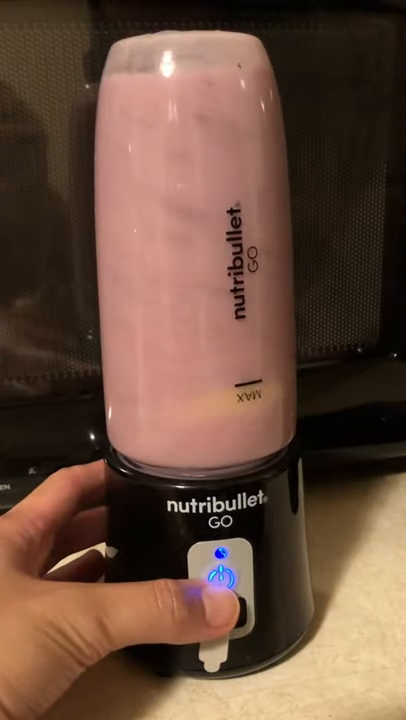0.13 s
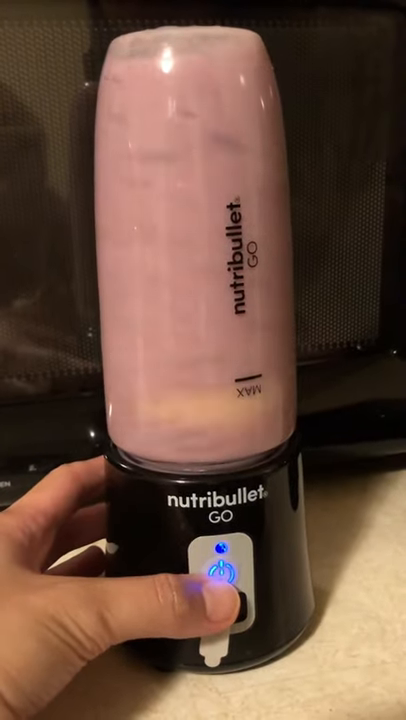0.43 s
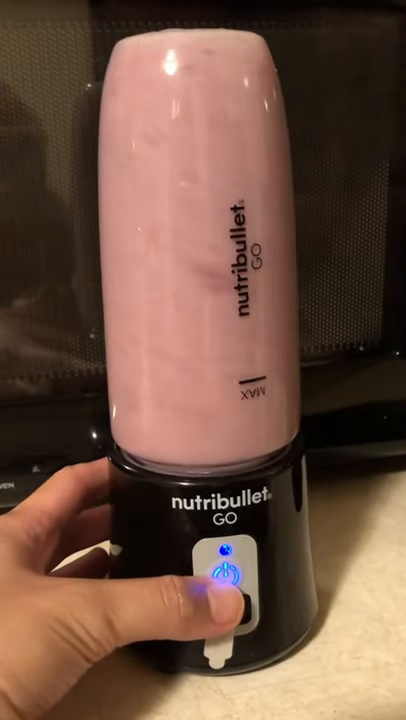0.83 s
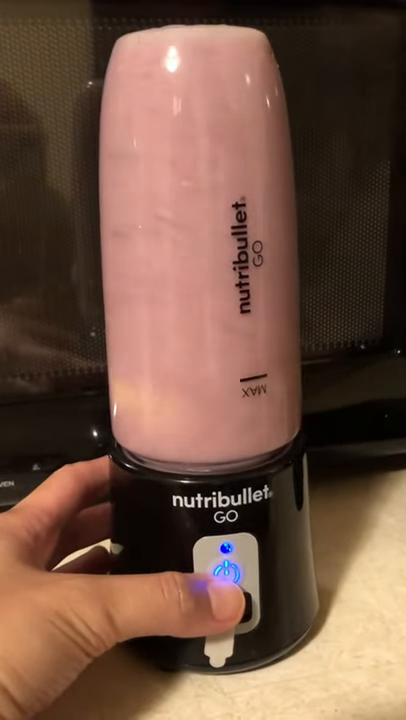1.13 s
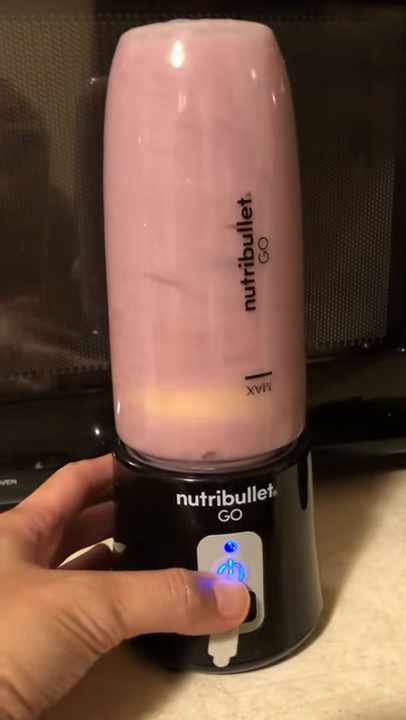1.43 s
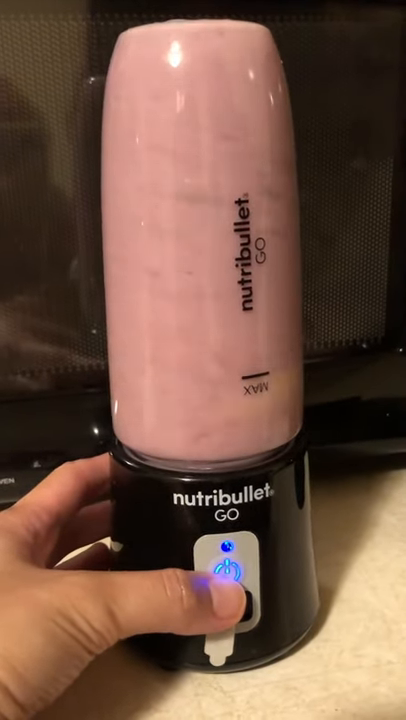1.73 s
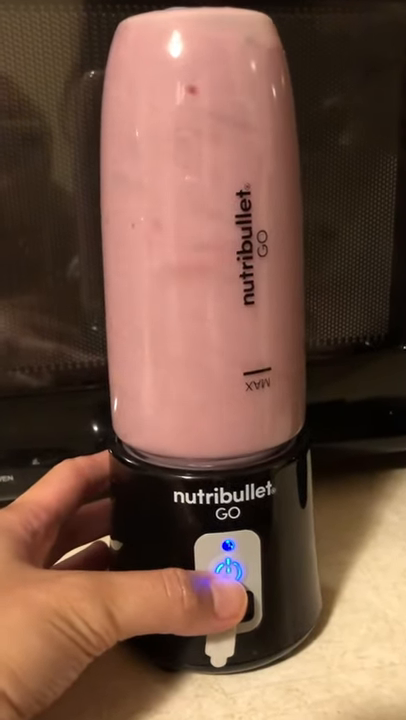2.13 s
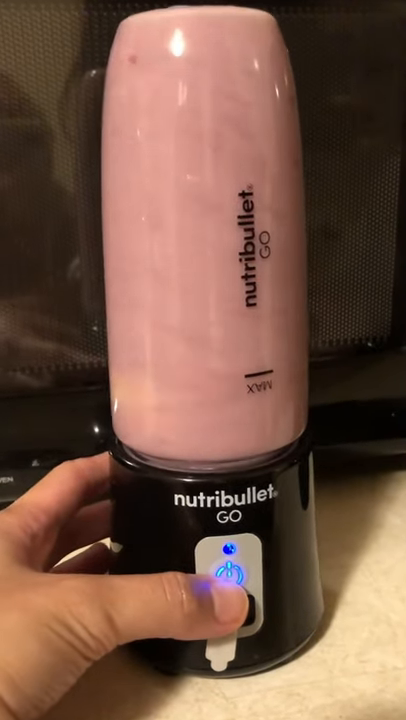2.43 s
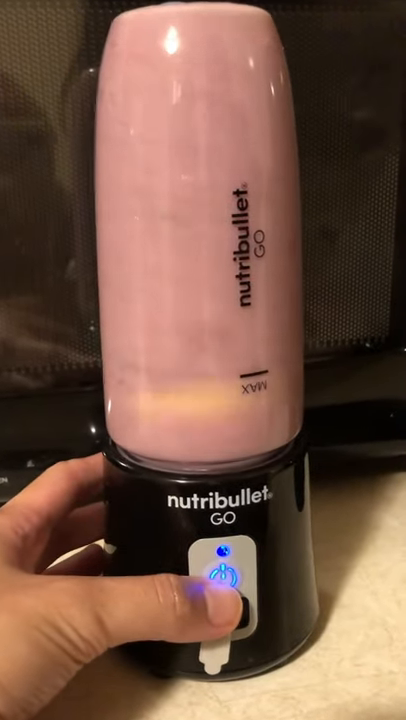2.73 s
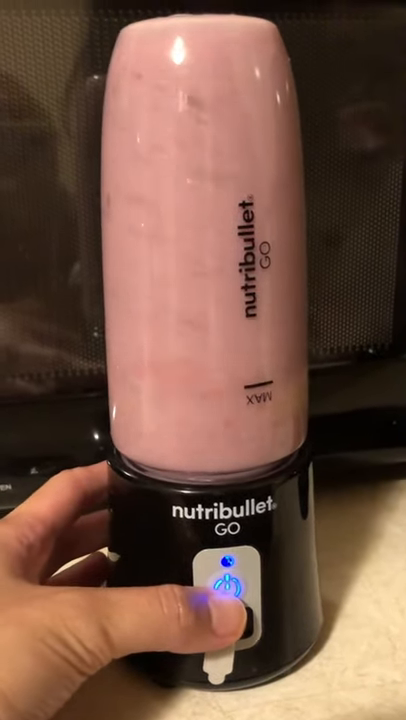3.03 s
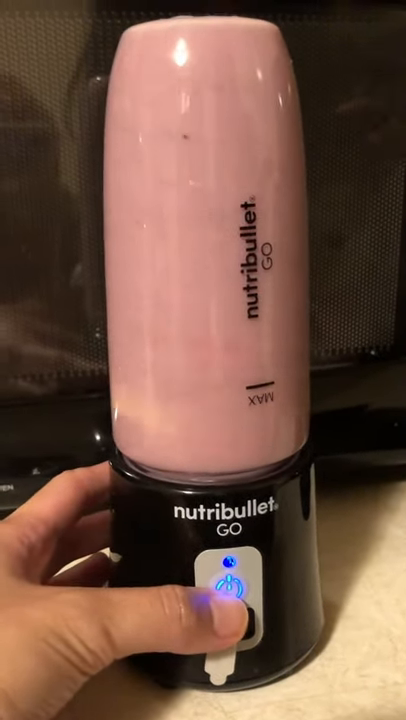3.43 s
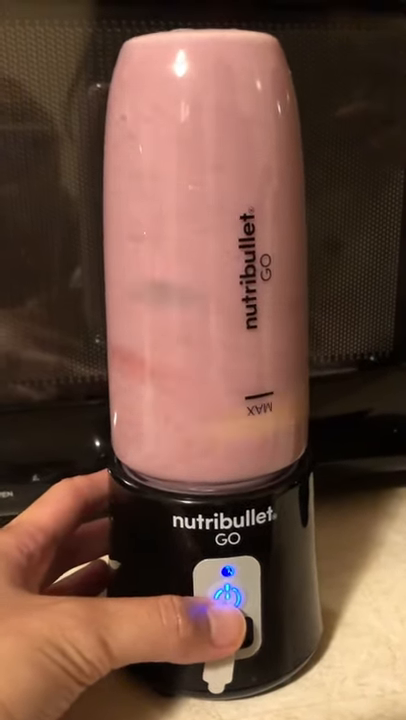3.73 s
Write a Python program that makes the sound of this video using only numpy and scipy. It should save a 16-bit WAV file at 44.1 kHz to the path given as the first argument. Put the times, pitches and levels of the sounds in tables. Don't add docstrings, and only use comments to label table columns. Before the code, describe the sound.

A small blender whirs and churns thick liquid steadily, with rough gurgling flutter and knocks.

```python
import sys
import numpy as np
from scipy import signal
from scipy.fft import rfft, irfft
from scipy.io import wavfile
from scipy.ndimage import uniform_filter1d, map_coordinates

SR = 44100
rng = np.random.default_rng(int(sys.argv[2]) if len(sys.argv) > 2 else 0)


def gain_from_decibels(decibels):
    exponent = np.asarray(decibels, float) / 20
    return 10 ** exponent


def log_audio(samples):
    frames = np.atleast_2d(samples).T
    limited = np.clip(frames, -1, 1)
    pcm = np.round(limited * 32767).astype(np.int16)
    wavfile.write(sys.argv[1], SR, pcm)


N = 171549
TIME = np.arange(N) / SR
SHAFT_HZ = 230.7


def unit(x):
    return x / np.sqrt(np.mean(x ** 2) + 1e-20)


def wobble(rate):
    knots = rng.standard_normal(int(N * rate / SR) + 4)
    return map_coordinates(knots, [np.arange(N) * rate / SR])


def ringing(modes, steep=1.307):
    f = np.fft.rfftfreq(16384, 1 / SR)
    power = 1e-14
    for hz, width, db in modes:
        detune = (f * f - hz * hz) / (f + 1) / width
        power = power + gain_from_decibels(db) ** 2 / (1 + detune ** 2) ** steep
    cepstrum = irfft(np.log(power) / 2)
    cepstrum[1:8192] *= 2
    cepstrum[8193:] = 0
    response = irfft(np.exp(rfft(cepstrum)))[:8192]
    return response / np.linalg.norm(response)


def through(x, response):
    return signal.fftconvolve(x, response)[:N]


def patchy(depth_db):
    grid = signal.stft(rng.standard_normal(N), nperseg=512)[2]
    field = uniform_filter1d(rng.standard_normal(grid.shape), size=6, axis=0)
    field = uniform_filter1d(field, size=8, axis=1)
    return unit(signal.istft(grid * gain_from_decibels(depth_db * unit(field)), nperseg=512)[1][:N])


# time in seconds, level in dB.
PULP_LOAD = [
    (0.0, -20),
    (0.16, -19.5),
    (0.43, -20.5),
    (1.66, -20),
    (1.71, -21),
    (2.46, -20.5),
    (2.96, -20.5),
    (3.7, -20),
    (3.89, -22.5),
]


def pulp_load():
    s, db = np.transpose(PULP_LOAD)
    surges_db = 0.23 * wobble(9.68) + 0.6 * wobble(34.39) + 0.83 * wobble(120)
    return gain_from_decibels(np.interp(TIME, s, db) + surges_db)


def bits():
    bits_per_s, tail_db = 1500, 2
    chance, side, force = rng.random((3, N))
    hits = (chance < bits_per_s / SR) * np.sign(side - .5)
    return unit(hits * gain_from_decibels(-tail_db * np.log(force + 1e-4)))


def sweeps():
    jitter, scatter_db, swell_db = .11, 3.4, 1.6
    turns = np.cumsum(SHAFT_HZ * (.97 + .03 * wobble(12))) / SR
    at = np.flatnonzero(np.diff(np.floor(turns)))
    late, size = rng.standard_normal((2, N))[:, at]
    at = at + (jitter * late * SR / SHAFT_HZ).astype(int)
    pushes = np.zeros(N)
    pushes[np.clip(at, 0, N - 1)] = gain_from_decibels(scatter_db * np.minimum(size, 2))
    return unit(pushes * gain_from_decibels(swell_db * wobble(30.12)))


# frequency in Hz, width in Hz, level in dB.
CUP_MODES = [(508, 170, -22), (655.3, 60, -12.5), (854, 41, -9.5), (1073, 102, 2), (1224, 137, -5.5),
             (1404, 82, -11.5), (1608, 156, -14), (1933, 204, -12.5), (2607, 360, -21), (2692, 320, -20),
             (3080, 213, -19), (3432, 320, -14), (3700, 230, -26.5), (4010, 480, -23)]


def cup_wall():
    return ringing(CUP_MODES)


def swirl(calm, swell, rattle):
    bits_db, splash_db = -7, -10
    rub = patchy(-(-1.1)) + gain_from_decibels(bits_db) * bits()
    splash = gain_from_decibels(splash_db) * swell * rng.standard_normal(N)
    return calm * rattle ** .3 * rub * gain_from_decibels(-1.5) + splash


# frequency in Hz, width in Hz, level in dB.
BASE_MODES = [(4630, 480, -4), (5745, 500, 0), (6140, 620, 1), (6520, 380, 1.5), (7150, 570, -6.5),
              (7900, 220, -6), (8420, 310, 1), (9270, 190, -2), (9810, 300, -7), (10980, 370, -9.5),
              (12100, 170, -8), (13000, 900, -20), (14400, 400, -14.5), (15200, 350, -15)]


def base(load, rattle, sweep):
    base_db, turn_gate_db = -16, 8
    gate = 1 + gain_from_decibels(turn_gate_db - 20.5) * unit(through(sweep, np.hanning(80)))
    grit = patchy(1.34) + gain_from_decibels(-8.5) * bits()
    shake = load * rattle * gate * grit * gain_from_decibels(-0.5 + 0.2 * wobble(40))
    return gain_from_decibels(base_db) * through(shake, ringing(BASE_MODES, steep=1.02))


# frequency in Hz, width in Hz, level in dB.
LUMPY_MODES = [(633, 41, -6), (836, 24, 3)]


def lumpy_boom(push):
    boom_db, fades_s = -7.5, 0.48
    return gain_from_decibels(boom_db) * np.exp(-TIME / fades_s) * through(push, ringing(LUMPY_MODES, steep=1.9))


# frequency in Hz, width in Hz, level in dB.
COUNTER_MODES = [(67, 32, -9), (88, 56, -13.5), (117.4, 4.7, -1.5), (158.3, 16.3, -1.5), (215, 20, -13),
                 (330, 105, -16.5)]


def counter(blows):
    counter_db, shaft_db, shaft_wander_db = -47.5, -54.5, 2.8
    early_db = 7.2 * np.exp(-((TIME - .2) / 0.19) ** 2)
    push = gain_from_decibels(counter_db + early_db + 1.4 * wobble(6.9)) * patchy(0.28) + blows
    turns = np.cumsum(SHAFT_HZ * (1 + .015 * wobble(6.2))) / SR
    hum = gain_from_decibels(shaft_db + shaft_wander_db * wobble(5.18)) * np.sin(2 * np.pi * turns)
    return through(push, ringing(COUNTER_MODES, steep=1.32)) + hum


# middle in seconds, shaft speed in turns per second.
CAUGHT = [(0.0321, 244.0), (0.0714, 185.0), (0.1763, 195.0), (0.2446, 208.0), (0.2984, 202.0),
          (0.4014, 243.0), (0.4346, 190.0), (0.6086, 243.0), (0.8162, 191.0), (0.8404, 185.0),
          (0.9872, 202.0), (1.0466, 191.0), (1.2397, 216.0), (1.3248, 185.0), (1.4497, 202.0),
          (1.4973, 205.0), (1.7385, 213.0), (1.7703, 233.0), (1.9205, 205.0), (2.1068, 199.0),
          (2.3778, 212.0), (2.4014, 214.0), (2.4365, 239.0), (2.7915, 213.0), (3.0382, 225.0),
          (3.1668, 225.0), (3.5664, 244.0), (3.663, 185.0), (3.71, 207.0), (3.8735, 200.0)]
# length in seconds, thud in dB, rattle over the base's hiss in dB.
STRIKES = [(0.031, -11, -3.0), (0.029, -11, -8), (0.02, -6, 1), (0.0086, -7, 5), (0.026, -13, 3.5),
           (0.026, -15.0, -15), (0.036, -15.5, -3), (0.045, -12, 3.5), (0.027, -14.5, -3), (0.066, -18, -5),
           (0.024, -10, 1), (0.015, -16, -13), (0.036, -9.5, 5), (0.021, -17, -4), (0.024, -9.5, 0.0),
           (0.03, -11.5, 3), (0.052, -11.5, 2.5), (0.012, -10.5, 3), (0.021, -9.5, 4), (0.028, -14.5, -8.0),
           (0.015, -17, -13.0), (0.02, -12, -7), (0.019, -10.0, 5.5), (0.033, -11.5, 4), (0.029, -11.5, -2),
           (0.02, -11, 1), (0.0095, -12.5, -7.0), (0.052, -17, -7.0), (0.025, -11, 3.5),
           (0.018, -13.5, 5.5)]


def chunks():
    knock_db, scatter_db, jitter = -1.5, 1.5, .03
    spread, rattle_share = 0.51, 0.66
    blows, swell, rattle = np.zeros((3, N))
    turn = np.arange(-8, 9)
    luck = rng.standard_normal((len(CAUGHT), 2, len(turn)))
    for (mid, rate), (length, db, rattle_db), (late, size) in zip(CAUGHT, STRIKES, luck):
        def shape(when, wide):
            return np.exp(-np.abs((when - mid) / (wide * length)) ** 1.67)

        when = mid + (turn + jitter * late) / rate
        at = np.clip(np.round(when * SR).astype(int), 0, N - 1)
        force = gain_from_decibels(db + knock_db + scatter_db * size)
        blows[at] += force * shape(when, spread) * np.sqrt(SR / rate)
        swell += gain_from_decibels(db) * shape(TIME, spread)
        rattle += gain_from_decibels(rattle_db) ** 2 * shape(TIME, spread * rattle_share)
    return blows, swell, np.sqrt(1 + rattle)


def thud(wall):
    low_hz, soft_hz, damped_t60, rise_s = 625, 1743, .03, .0008
    t = np.arange(len(wall)) / SR
    damped = wall * gain_from_decibels(-60 * t / damped_t60) * (1 - np.exp(-t / rise_s))
    soft = signal.lfilter(*signal.butter(2, [low_hz, soft_hz], "band", fs=SR), damped)
    return soft / np.linalg.norm(soft)


def blender():
    hold_back, sweep_db = .2, -4
    load, wall, sweep = pulp_load(), cup_wall(), sweeps()
    blows, swell, rattle = chunks()
    calm = load / (1 + hold_back * swell / load)
    pulp = swirl(calm, swell, rattle)
    knocks = blows + gain_from_decibels(sweep_db) * calm * sweep
    cup = through(pulp, wall) + through(knocks, thud(wall))
    body = base(load, rattle, sweep) + lumpy_boom(pulp + knocks)
    return cup + body + counter(gain_from_decibels(-37.5) * blows)


# start in seconds, peak level in dB.
SEED_HITS = [
    (.176, -27),
    (.8533, -17),
    (1.703, -27),
    (2.0856, -28),
    (3.6939, -27),
]


def seeds():
    seed_db, low_hz, t60 = 2, 5000, .004
    out, t = np.zeros(N + 900), np.arange(900) / SR
    for s, db in SEED_HITS:
        start = round(s * SR)
        out[start:start + 900] += gain_from_decibels(db + seed_db - 60 * t / t60) * rng.standard_normal(900)
    return signal.lfilter(*signal.butter(2, low_hz, "high", fs=SR), out[:N])


def room(x):
    room_db, t60 = -12.5, 0.14
    t = np.arange(SR // 4) / SR
    tail = rng.standard_normal(len(t)) * gain_from_decibels(-60 * t / t60) * (t > .003)
    return gain_from_decibels(room_db) * through(x, tail / np.linalg.norm(tail))


def scene():
    near = blender() + seeds()
    return (near + room(near))[None]


def roll_off(x):
    return signal.sosfilt(signal.butter(12, 15720, fs=SR, output="sos"), x)


def record(dry):
    notch_hz, notch_wide_hz, notch_depth, low_cut_hz, peak_limit = 13950, 230, .75, 52, .97
    f = np.fft.rfftfreq(N + 1 - N % 2, 1 / SR)
    notch = 1 - notch_depth * np.exp(-((f - notch_hz) / notch_wide_hz) ** 2)
    low_cut = 1 / np.sqrt(1 + (low_cut_hz / (f + 1)) ** 6)
    x = irfft(rfft(dry) * notch * low_cut, N)
    return roll_off(x / (1 + np.abs(x / peak_limit) ** 8) ** (1 / 8))


dry = scene()
out = record(dry)
log_audio(out)
```